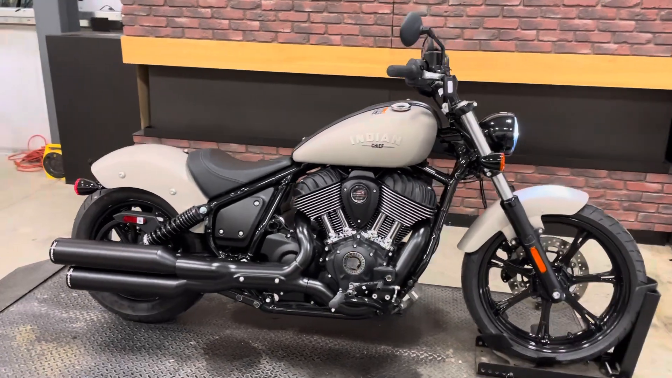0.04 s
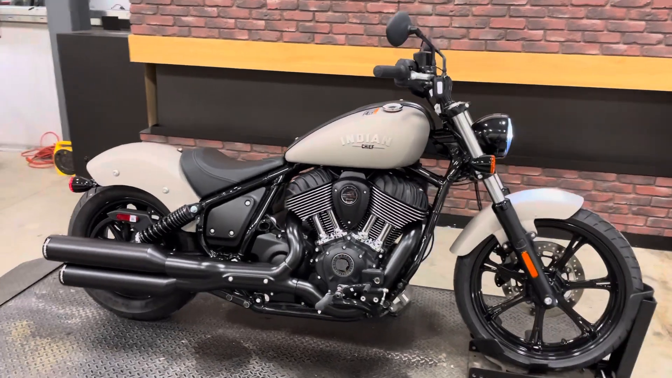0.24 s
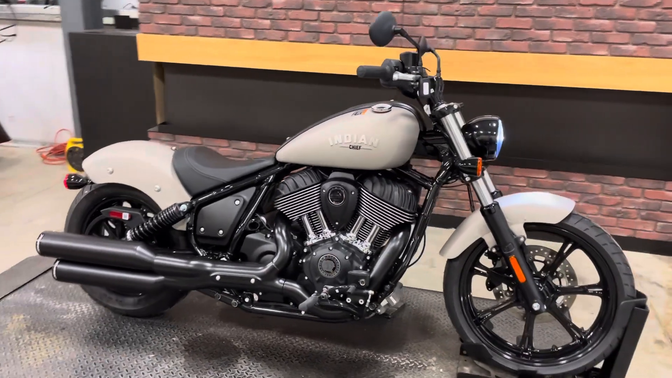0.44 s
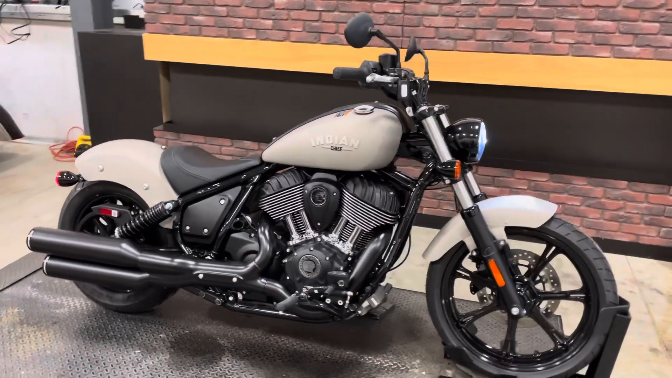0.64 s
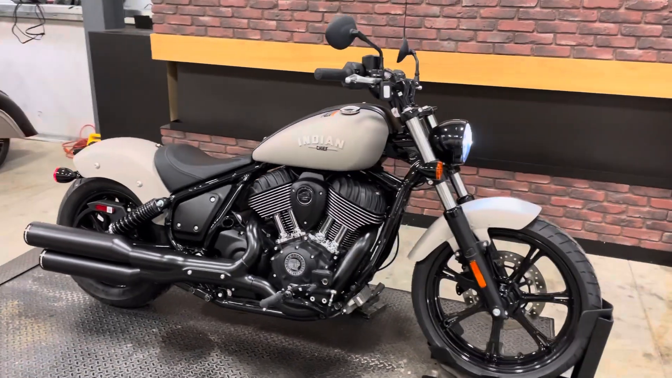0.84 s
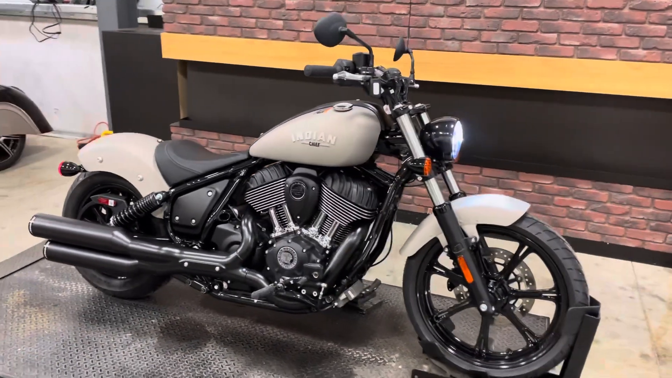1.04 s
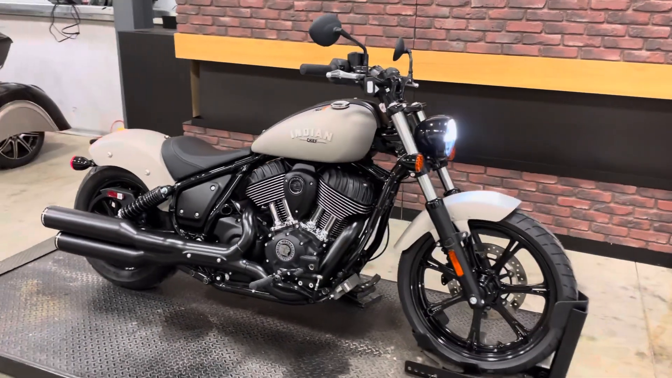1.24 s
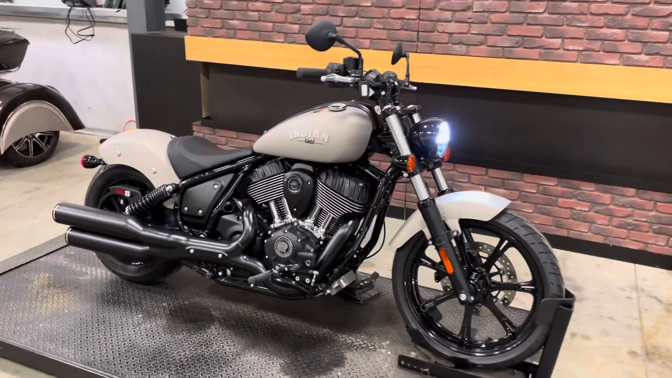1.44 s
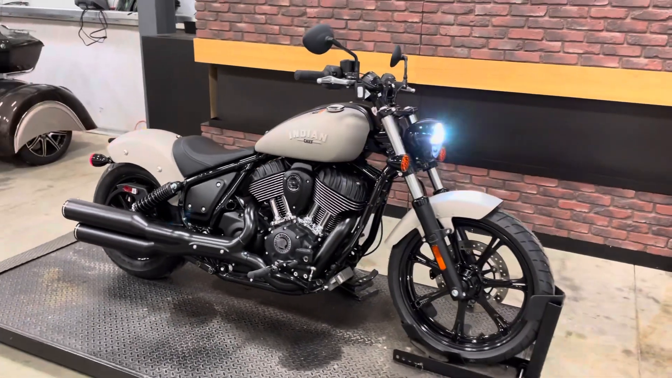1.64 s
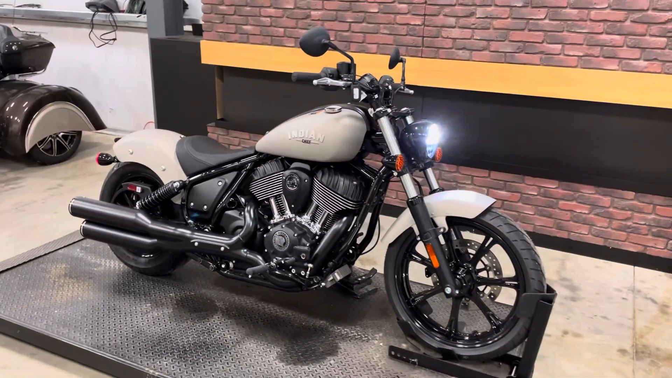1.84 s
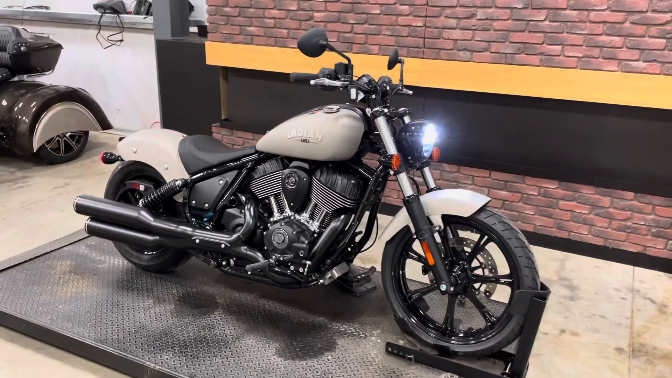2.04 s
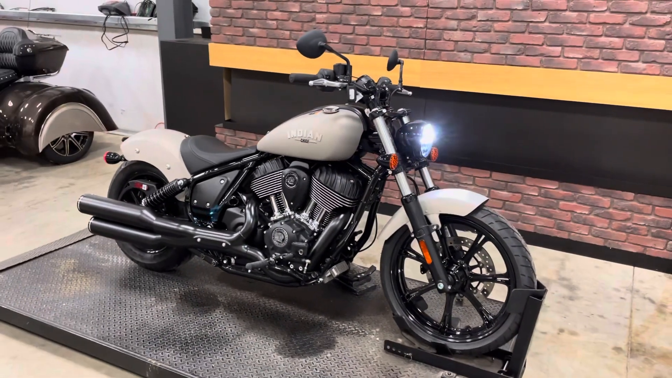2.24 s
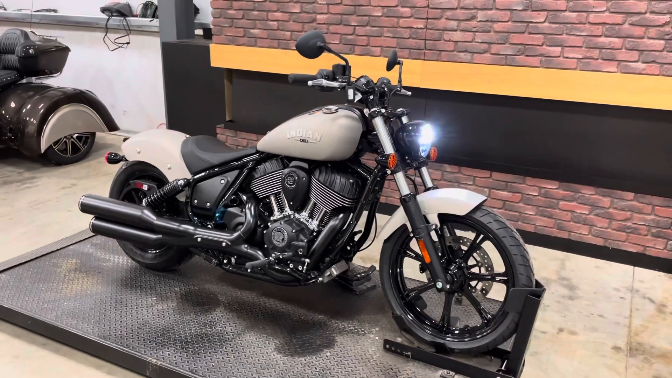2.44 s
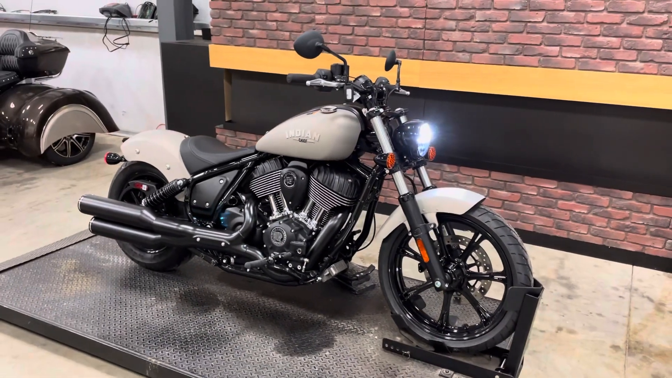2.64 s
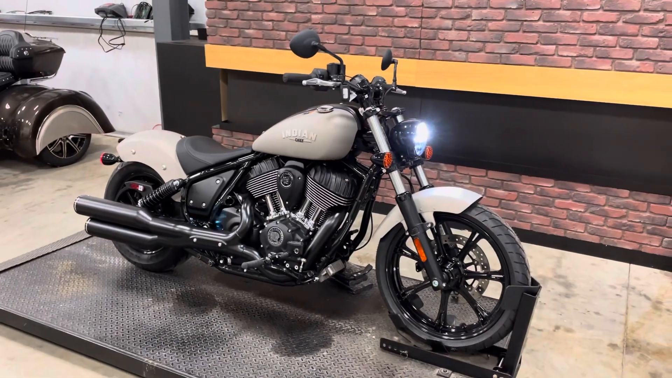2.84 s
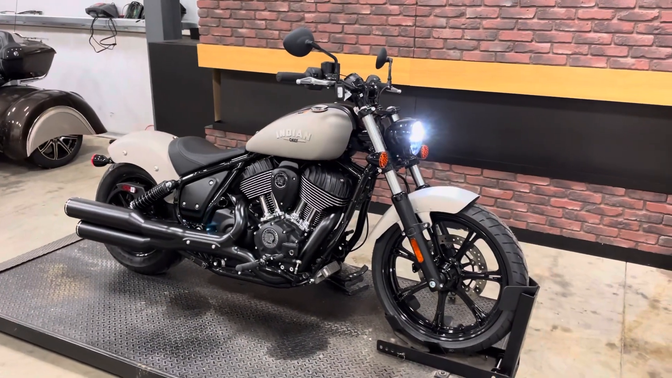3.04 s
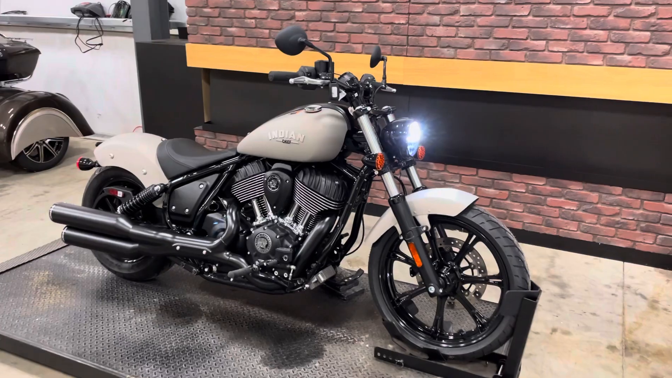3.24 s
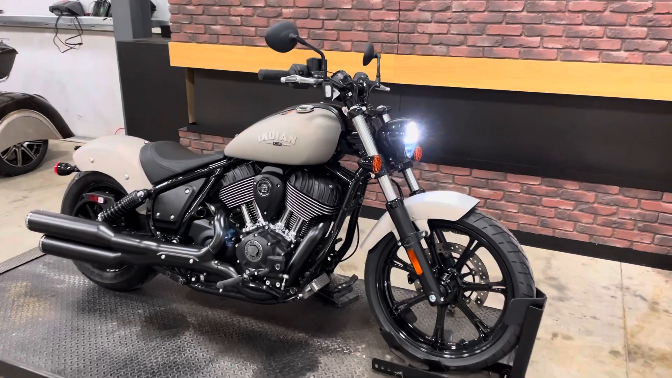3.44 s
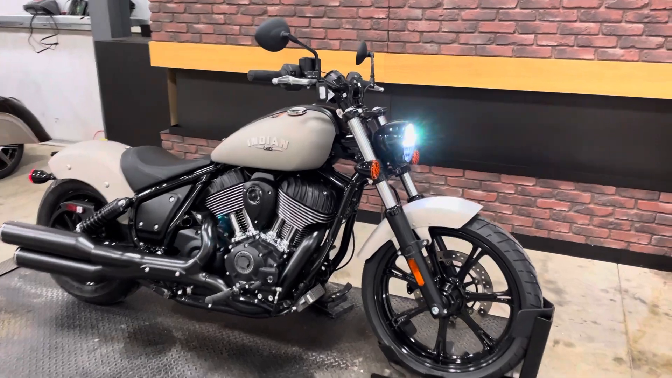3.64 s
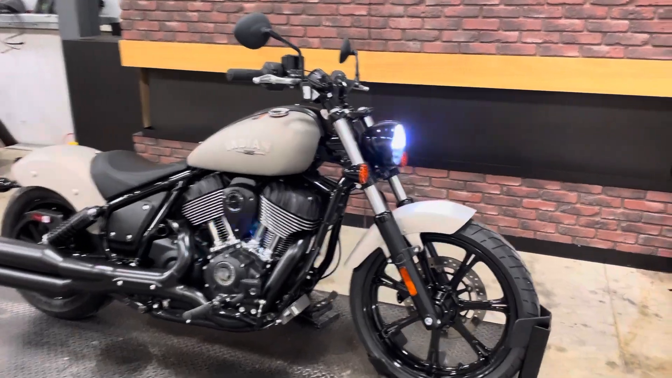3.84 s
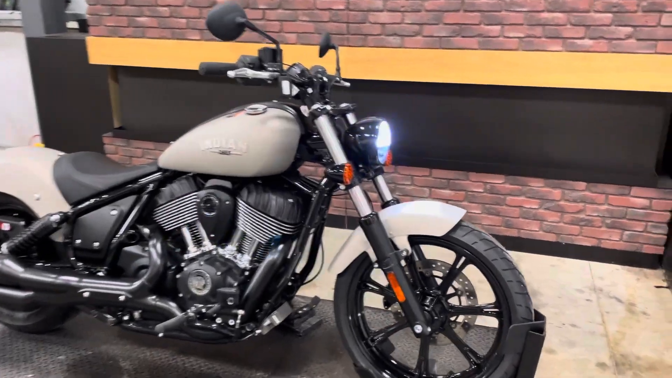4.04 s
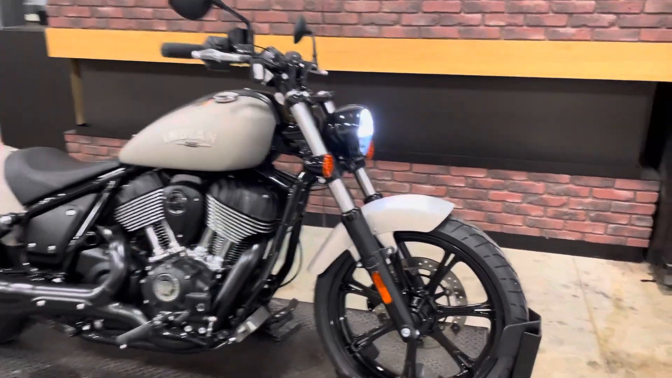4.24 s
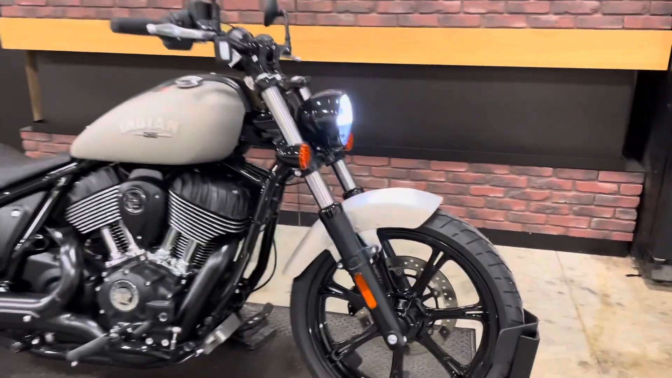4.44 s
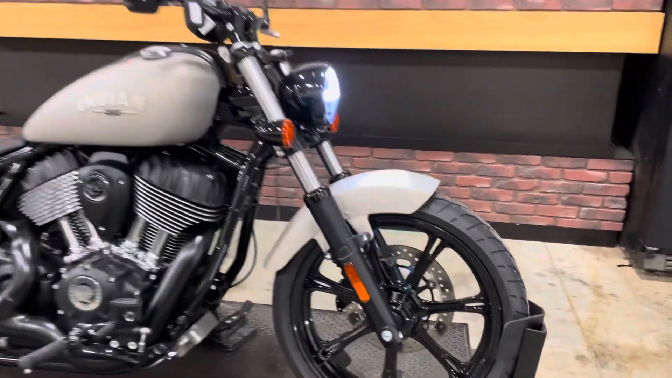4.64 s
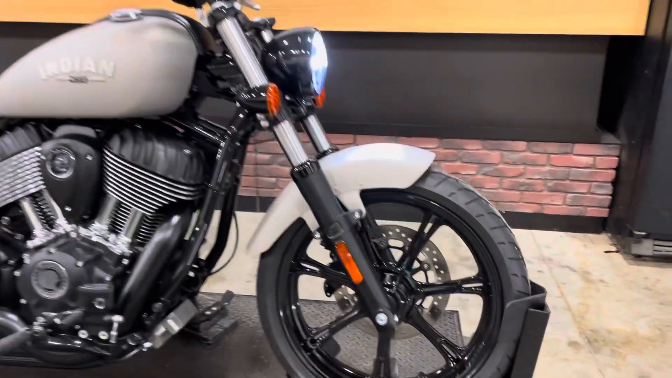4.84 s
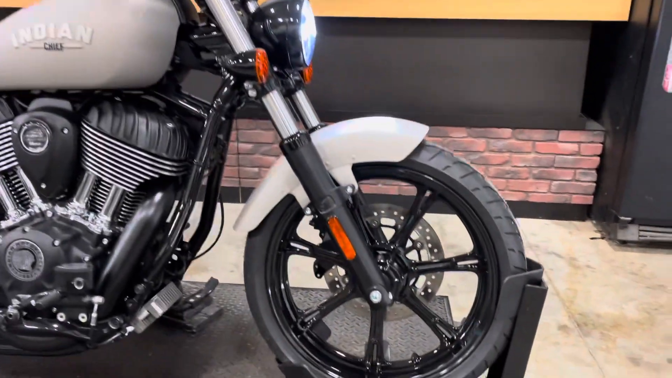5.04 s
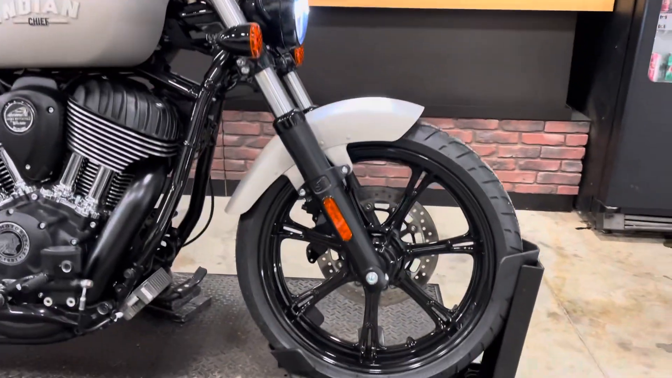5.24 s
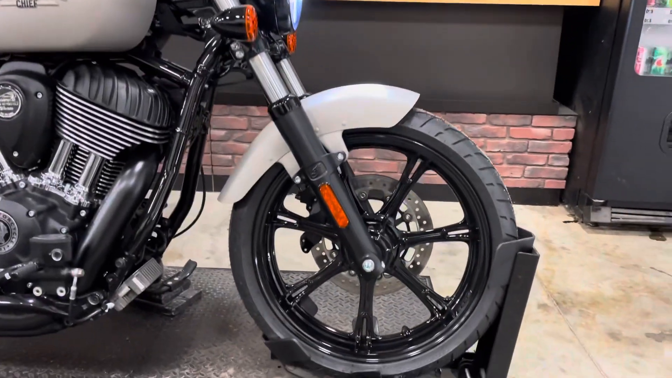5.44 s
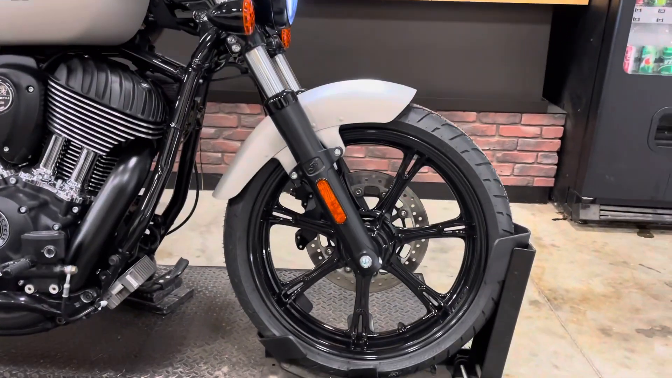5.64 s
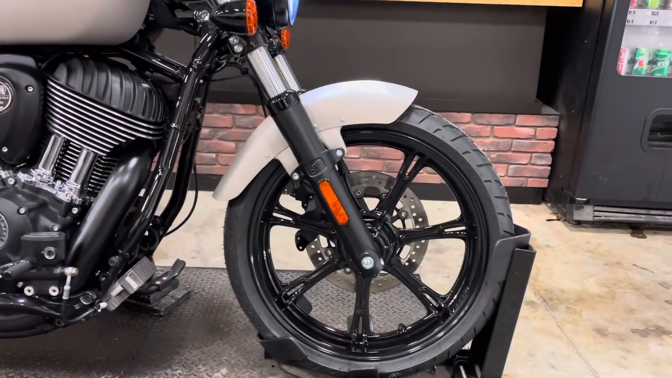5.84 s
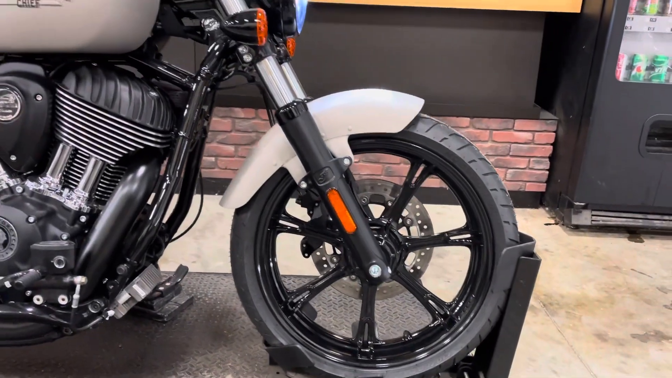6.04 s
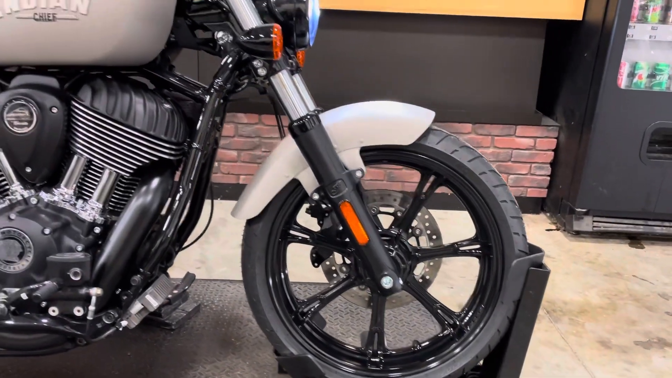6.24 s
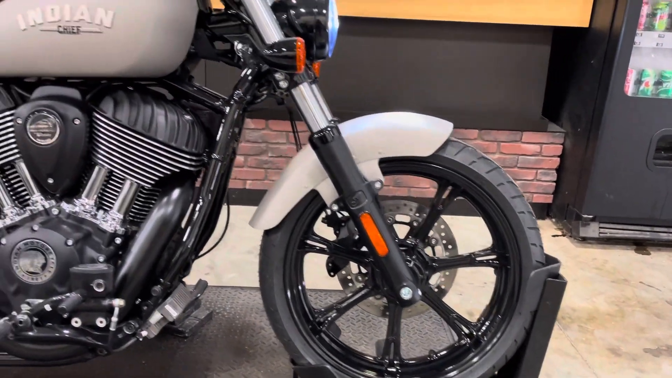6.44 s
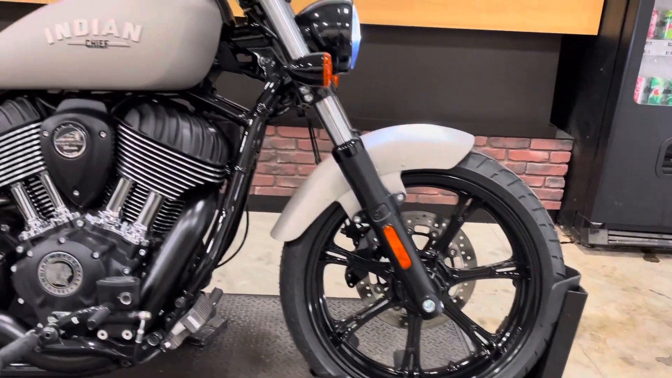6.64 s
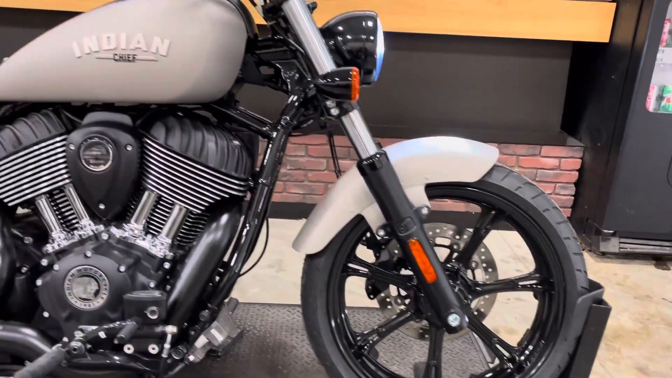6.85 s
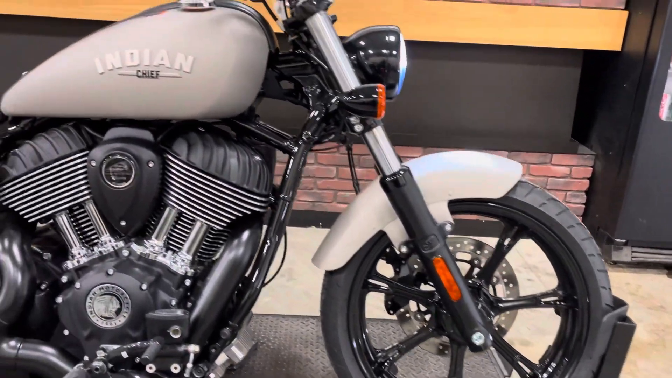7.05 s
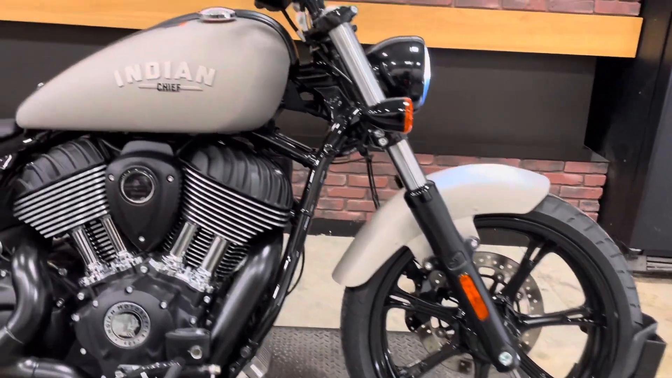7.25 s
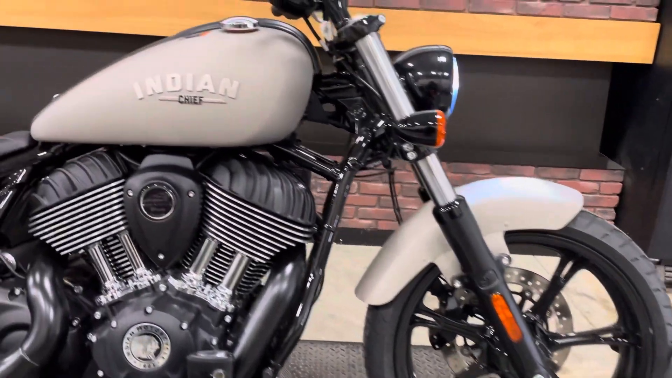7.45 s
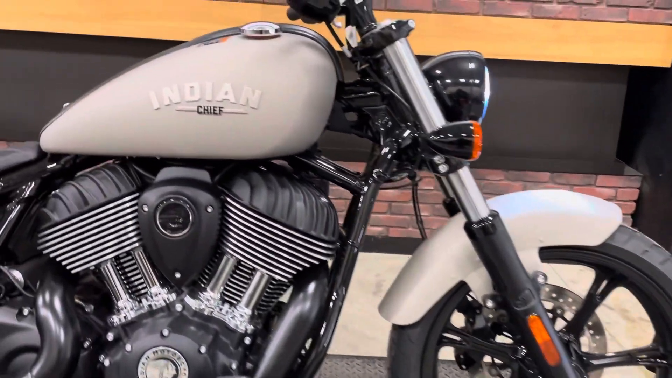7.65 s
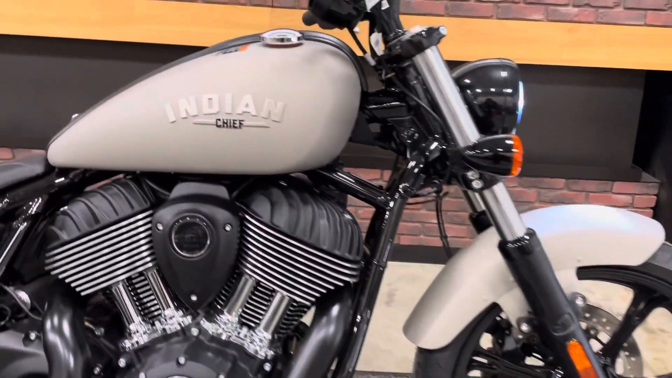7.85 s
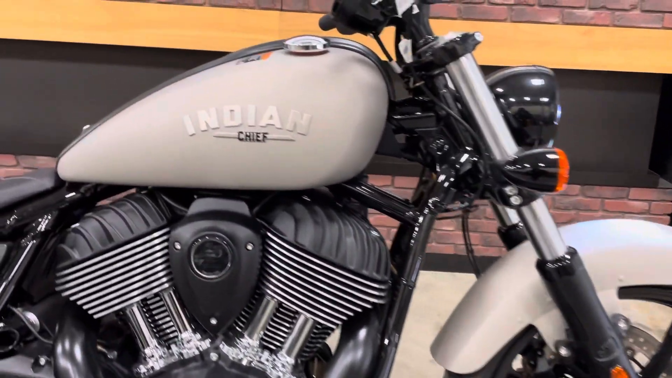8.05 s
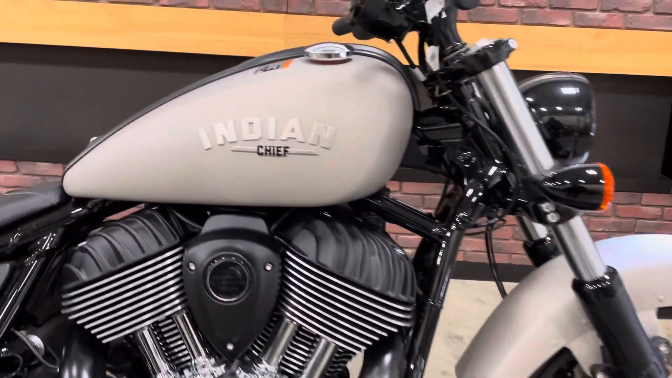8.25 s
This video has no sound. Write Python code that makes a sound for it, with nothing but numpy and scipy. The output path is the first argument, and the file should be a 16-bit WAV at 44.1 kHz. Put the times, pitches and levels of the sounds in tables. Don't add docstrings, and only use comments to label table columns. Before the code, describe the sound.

A big twin-cylinder motorcycle idles with an uneven, loping low thump and metallic engine clatter, growing louder and closer in a hard-walled showroom.

```python
import sys
import numpy as np
from scipy import signal
from scipy.fft import rfft, irfft, next_fast_len
from scipy.io import wavfile
from scipy.ndimage import uniform_filter1d, map_coordinates

SR = 44100
rng = np.random.default_rng(int(sys.argv[2]) if len(sys.argv) > 2 else 0)


def to_wav(s):
    ch = np.atleast_2d(s).T
    pcm = np.round(np.clip(ch, -1, 1) * 32767)
    wavfile.write(sys.argv[1], SR, pcm.astype(np.int16))


def nominal_scale(level):
    x = np.asarray(level, float) / 20
    return 10 ** x


N = 366030


def unit(x):
    return x / np.sqrt(np.mean(x ** 2) + 1e-20)


def along(points, hz):
    f, v = np.transpose(points)
    return np.interp(np.log(hz + 1), np.log(f + 1), v)


def curves(rows):
    s, *columns = np.transpose(rows)
    return [np.interp(np.arange(N) / SR, s, column) for column in columns]


def wobble(rate):
    knots = rng.standard_normal(int(N * rate / SR) + 4)
    return map_coordinates(knots, [np.arange(N) * rate / SR])


def marked(rows, times):
    out = np.zeros(len(times))
    for s, db in rows:
        out[np.argmin(abs(times - s))] = db
    return out


def filtered(x, response):
    m = next_fast_len(N + SR // 2)
    return irfft(rfft(x, m) * response(np.fft.rfftfreq(m, 1 / SR)), m)[..., :N]


def peaks(modes, hz):
    return sum(db / (1 + (2 * (hz - centre) / width) ** 2) for centre, width, db in modes)


# t/s, engine cycles turned
CRANK = [(0.0062, 0.0), (0.6821, 4.5), (0.8199, 5.5), (1.0464, 7.0), (1.1127, 7.5), (1.706, 11.5),
         (2.0699, 14.0), (2.9565, 20.0), (3.0403, 20.5), (3.4759, 23.5), (3.9285, 26.5), (4.5811, 31.0),
         (4.9619, 33.5), (5.3844, 36.5), (6.99, 47.5), (7.1432, 48.5), (7.5145, 51.0), (8.2431, 56.0)]
# t/s, thump level/dB
WEAK = [(0.096, -1.5), (0.307, -6), (0.457, -3.5), (0.609, -5.5), (0.754, -4.5), (0.894, -1), (1.046, -3),
        (1.335, -5.5), (1.634, -7), (1.864, -8.5), (2.071, -3), (2.368, -6), (2.747, 3.5), (2.81, -3.5),
        (2.959, -11), (3.115, -2.5), (3.404, -4.5), (3.704, -11.5), (4.145, -6), (4.735, 0.5), (4.821, -4),
        (5.314, -1.5), (6.917, -5), (7.067, -2), (7.662, -1.5), (8.099, -6), (8.245, -5)]
# t/s, level/dB
NEAR = [(0, 0.5), (.9, 1.5), (2, 2), (2.7, 4), (3.5, 6), (4.3, 8), (5.2, 11.5), (5.8, 10.5), (6.5, 12.5),
        (7, 13), (7.6, 15), (8.3, 13.5)]
FRONT_AFTER = .58
LATE_S_PER_DB, LATE_TOP_DB = .00026, 8


def firings():
    s, turned = np.transpose(CRANK)
    k = np.arange(int(2 * turned[-1]) + 1)
    due = np.interp(k // 2 + k % 2 * FRONT_AFTER, turned, s)
    loss_db = marked(WEAK, due)
    late = LATE_S_PER_DB * np.clip(-loss_db, 0, LATE_TOP_DB)
    times = due + late + np.roll(late, 1) * (k > 0)
    return times, k % 2, loss_db, np.interp(times, *np.transpose(NEAR))


def train(sizes, lead):
    spikes = np.zeros(N)
    at = ((firings()[0] - lead) * SR).astype(int)
    spikes[np.clip(at, 0, N - 1)] = sizes
    return spikes


def swell(sizes, lead, rise, fall):
    t = np.arange(SR // 6) / SR
    shape = (1 - np.exp(-(t / rise) ** 2)) * np.exp(-t / fall)
    return signal.oaconvolve(train(sizes, lead), shape)[:N]


# f/Hz, level/dB per Hz
CENTRE = [(150, -16), (250, -2), (360, -2), (536, -9), (772, -7), (1470, -17.5), (2420, -23.5),
          (3430, -26.5), (5870, -25.5), (7400, -33), (8400, -40), (9700, -32), (11500, -29), (13200, -36),
          (14400, -47), (15900, -53)]
# f/Hz, level/dB per Hz
SIDES = [(150, -30.5), (250, 3), (616, -1.5), (772, -1), (1390, -3), (2150, -20.5), (3800, -28),
         (6400, -27.5), (8300, -23.5), (10000, -28.5), (11600, -52), (13000, -35.5), (14500, -29.5),
         (15900, -34)]
# f/Hz, phase/rad
TURN = [(250, 2.1), (600, 0.79), (1200, 1.24), (3000, 0.6), (8000, 0.9)]
# f/Hz, width/Hz, level/dB
BODY = [(351, 57, 2), (484, 27, 4), (573, 4.2, 6), (670, 37, 3), (1690, 11, 6.5), (2300, 28, 3.5),
        (4580, 80, 3), (5050, 82, 2), (6040, 74, -7.5)]


def ports(share, lo_hz, hi_hz, side_db, alike, patchy_db):
    z = rng.standard_normal((2, 257, N // 256 + 2, 2)) @ [1, 1j]
    field = uniform_filter1d(rng.standard_normal(z.shape[1:]), 5, 0)
    field = uniform_filter1d(field, 6, 1)
    window = np.sin(np.pi * (np.arange(512) + .5) / 512)
    a, b = signal.istft(z * nominal_scale(patchy_db * unit(field)), window=window, nperseg=512)[1][:, :N]
    pair = np.array([a, alike * a + np.sqrt(1 - min(alike, 1) ** 2) * b])

    def response(hz):
        port_db = np.array([along(CENTRE, hz), along(SIDES, hz) + side_db])
        colour = nominal_scale(along(share, hz) + peaks(BODY, hz) + port_db)
        return colour * [1 + 0 * hz, np.exp(1j * along(TURN, hz))]

    pair = filtered(pair, response)
    size = 2 ** 18
    part = rfft(pair[0, :size])[int(lo_hz / SR * size):int(hi_hz / SR * size)]
    return pair * 2 ** 17.5 / np.linalg.norm(part)


def beat():
    return unit(1 + .5 * swell(1.0, lead=0.014, rise=0.0096, fall=0.012))


# f/Hz, level/dB
CLATTER = [(250, -6.5), (1000, -4.5), (1600, -3), (3000, -10.5), (6000, -41.5)]
CLATTER_DB, CLATTER_GROWS = -46, 0.9


def clatter(near_db):
    level_db = CLATTER_DB + CLATTER_GROWS * near_db + 0.37 * wobble(4.32)
    noise = ports(CLATTER, 478, 1500, side_db=-14.5, alike=0.91, patchy_db=1.5)
    return nominal_scale(level_db) * beat() * noise


# f/Hz, level/dB
WHIRR = [(800, -57.5), (2000, 6.5), (4000, 4.5), (7000, 3), (10000, -8)]
WHIRR_DB, WHIRR_GROWS = -54.5, 0.98


def whirr(near_db):
    level_db = WHIRR_DB + WHIRR_GROWS * near_db + 0.96 * wobble(4)
    noise = ports(WHIRR, 1750, 8400, side_db=-2.5, alike=0.5, patchy_db=3.0)
    return nominal_scale(level_db) * beat() * noise


# t/s, silencer level/dB, tank level/dB
FACING = [
    (0, -3, -1),
    (.7, -3, 0),
    (1.2, 2, -1),
    (2.4, -2, 1),
    (3.4, 1.5, -3),
    (4, 3.5, 2.5),
    (4.6, -2.5, 4.5),
    (5.5, 1, 2),
    (7.2, -3, 1),
    (8.3, 0.5, 1),
]
SILENCER_DB, SILENCER_GROWS = -46, 0.67
TANK_DB, TANK_GROWS, DRIFT_DB = -56, 1.0, 1


def drones(near_db):
    silencer_band = [(290, -26.0), (350, 0.0), (400, -2.0), (460, -40)]  # f/Hz, level/dB
    tank_band = [(660, -34), (750, -7.5), (790, -10.5), (880, -37.0)]  # f/Hz, level/dB
    silencer = ports(silencer_band, 335, 500, side_db=-11, alike=1.0, patchy_db=0.5)
    tank = ports(tank_band, 730, 810, side_db=-12.5, alike=0.9, patchy_db=2.0)
    throb = unit(1 + 0.79 * swell(0.99, lead=0, rise=0.0054, fall=0.02))
    silencer_db, tank_db = curves(FACING)
    silencer_db = silencer_db + SILENCER_DB + SILENCER_GROWS * near_db + DRIFT_DB * wobble(3.3)
    tank_db = tank_db + TANK_DB + TANK_GROWS * near_db + DRIFT_DB * wobble(3)
    return throb * (nominal_scale(silencer_db) * silencer + nominal_scale(tank_db) * tank)


# t/s, level/dB
HARD = [(0.007, 4), (0.609, -6), (0.754, 1), (1.126, 6.5), (1.482, -7), (1.719, 3.5), (2.071, 2),
        (2.218, 0), (2.302, 1.5), (2.515, -4), (2.81, 0), (3.258, 3), (3.49, 2), (3.704, -4.5), (3.941, 2),
        (4.003, -2), (4.085, -4), (4.145, -8.5), (4.518, 4), (4.581, -3.5), (4.67, 3), (4.821, 6),
        (4.886, -1.5), (5.175, -4), (6.479, 1), (6.773, -4.5), (7.365, -0.5), (7.888, 2)]
# f/Hz, level/dB
PUFF = [(300, -12), (900, -14.5), (2000, -3), (5000, -4), (9000, 0.5)]
# t/s, puff level/dB
PIPES = [
    (0, 2),
    (1.3, 2),
    (2.1, -2),
    (2.7, 0.5),
    (3.2, 1),
    (6, 3),
    (8.3, 1.5),
]
PUFF_DB, PUFF_GROWS, FRONT_PUFF_DB = -52.5, 1.26, 2.5
PUFF_SCATTER_DB = 1.2
PUFF_FOLLOWS = 0.63


def puffs():
    times, front, _, near_db = firings()
    size_db = PUFF_DB + PUFF_GROWS * near_db + FRONT_PUFF_DB * front
    size_db += PUFF_FOLLOWS * marked(HARD, times) + np.interp(times, *np.transpose(PIPES))
    size_db += PUFF_SCATTER_DB * rng.standard_normal(len(front))
    size = nominal_scale(size_db)
    burst = swell(size, lead=0.016, rise=0.0046, fall=0.0077)
    hiss = nominal_scale(-9.5) * swell(size, lead=0.0091, rise=0.0053, fall=0.02)
    noise = ports(PUFF, 7950, 13500, side_db=-1.5, alike=0.25, patchy_db=3.5)
    return nominal_scale(-1.0) * (burst + hiss) * noise


KNOCK_DB, KNOCK_GROWS = -40, 1.225
KNOCK_SCATTER_DB = 1.3


def blows():
    times, _, _, near_db = firings()
    loss_db = KNOCK_SCATTER_DB * rng.exponential(size=len(times))
    return marked(HARD, times) + KNOCK_DB + KNOCK_GROWS * near_db - loss_db


# f/Hz, far level/dB, near level/dB, t60/s
CASES = [(947, 5.5, -4.5, 0.037), (1314, 2.5, -7, 0.042), (1639, -6.5, -3.5, 0.045), (1815, -7, 1, .035),
         (1970, -8, 2, 0.025), (2288, -0.5, -3.5, 0.059), (2451, -9, -1, 0.052), (2597, -10, -6.5, 0.037),
         (3140, -6.5, -9, 0.046), (3625, -13.5, -11.5, 0.028), (3973, -12, -12.5, 0.033),
         (4560, -4.5, -18, 0.059), (5040, -10.5, -9.5, 0.041), (5780, -5, -7.5, 0.044)]
NEAREST_DB = 13.5


def knocks(blow_db, rise_s=.0025):
    out, t = np.zeros((2, N + SR)), np.arange(SR // 25) / SR
    hz, far_db, close_db, t60 = np.transpose(CASES)[:, :, None]
    ring = nominal_scale(-60 * t / t60) * (1 - np.exp(-(t / rise_s) ** 2))
    times, _, _, near_db = firings()
    taps = ((-.0135, -3), (.008, -7.5), (.03, -12.5))
    for s, db, share in zip(times, blow_db, np.clip(near_db / NEAREST_DB, 0, 1)):
        mode_db = far_db + share * (close_db - far_db)
        for lag, drop_db in taps:
            chance = rng.standard_normal((len(CASES), 3))
            size = nominal_scale(db + drop_db + mode_db + 4.57 * chance[:, :1])
            phase = 2 * np.pi * hz * (1 + 0.023 * chance[:, 1:2]) * t + 3 * chance[:, 2:3]
            tap = (size * ring * np.sin(phase.astype(np.float32))).sum(0)
            out[0, max(round((s + lag) * SR), 0):][:len(t)] += tap
    return out[:, :N]


# f/Hz, level/dB
CRACK = [(500, -16), (1200, -14.5), (2300, 9.5), (4500, -7), (8000, 1.5), (12000, -4.5)]


def ticks(blow_db):
    size = nominal_scale(blow_db)
    strike = swell(size, lead=0.01286, rise=0.0025, fall=0.0027)
    seating = nominal_scale(-10) * swell(size, lead=-0.0087, rise=0.0018, fall=0.0024)
    noise = ports(CRACK, 1000, 3000, side_db=-9.5, alike=1.0, patchy_db=0.5)
    return nominal_scale(0.5) * (strike + seating) * noise


# t/ms, f/Hz, signed size far, midway, near
REAR = [(-4.5, 82, -0.18, -0.19, -0.33), (-3.0, 200, 0.12, 0.09, 0.1), (3.5, 168, 0.18, 0.18, 0.2),
        (4.5, 100, 0.49, 0.61, 0.81), (16.5, 130, 0.13, 0.22, 0.52), (28.0, 168, 0.27, 0.33, 0.58),
        (32.0, 82, -0.08, -0.15, 0.2), (35.5, 150, -0.01, -0.29, -0.28), (45.5, 200, -0.1, -0.07, 0.07),
        (46.5, 82, 0.06, -0.22, -0.32), (55.0, 168, -0.06, -0.08, -0.16), (65.0, 100, 0.14, 0.26, 0.28),
        (67.5, 82, 0.02, -0.01, 0.28), (78.0, 150, 0.08, -0.09, -0.15)]
# t/ms, f/Hz, signed size far, midway, near
FRONT = [(-2.5, 200, 0.16, 0.31, 0.26), (2.0, 100, 0.2, 0.23, 0.17), (4.5, 115, 0.75, 0.91, 0.86),
         (13.5, 168, 0.11, 0.16, 0.03), (26.0, 130, 0.21, 0.01, 0.41), (35.0, 150, -0.02, -0.53, -0.39),
         (36.5, 130, 0.15, 0.09, -0.5), (39.0, 65, 0.04, 0.2, 0.1), (51.5, 150, 0.19, 0.19, 0.02),
         (56.5, 82, 0.18, 0.05, 0.27), (73.0, 130, 0.11, 0.32, 0.1), (81.5, 150, 0.04, 0.17, 0.29),
         (95.0, 130, -0.17, -0.12, -0.29), (114.0, 115, -0.04, -0.14, -0.2)]
# t/s, place (0 far - 2 near)
WALK = [
    (2, 0),
    (5, 1),
    (7.3, 2),
]
# nearness level/dB, thump level/dB
HELD = [(0, -6), (1, -3), (5.5, -1.6), (9, 2.14), (13, 1.4)]
THUMP_SCATTER_DB = -0.44


def thumps(cycles=.9, squeeze=.6):
    before = SR // 25
    out, t = np.zeros(N + SR), np.arange(-before, SR // 7) / SR
    times, front, loss_db, near_db = firings()
    scatter_db = THUMP_SCATTER_DB * rng.standard_normal(len(times))
    level_db = np.interp(near_db, *np.transpose(HELD)) + loss_db + scatter_db
    places = np.interp(times, *np.transpose(WALK))
    arrivals = [np.array(REAR), np.array(FRONT)]
    packets = []
    for rows in arrivals:
        turns = (t - rows[:, :1] / 1000) * rows[:, 1:2]
        packets.append(np.cos(2 * np.pi * turns) * np.exp(-(turns / cycles) ** 2))
    for s, which, db, place in zip(times, front, level_db, places):
        rows = arrivals[which]
        size = np.array([np.interp(place, np.arange(len(r)), r) for r in rows[:, 2:]])
        size = size * nominal_scale(rng.normal(0, 1.4, len(rows)) * (rows[:, 0] > 12))
        out[round(s * SR):][:len(t)] -= nominal_scale(squeeze * db + 0.06) * size @ packets[which]
    return out[before:][:N]


# f/Hz, level/dB per Hz
BOOM = [(13, -51.5), (30, -7), (66, -4), (90, -1.5), (195, -0.5), (235, -14), (300, -26.5), (400, -69.5)]
# f/Hz, level/dB
BOOM_SIDE = [(30, -28), (100, -19), (200, -18.5), (300, -30)]
# f/Hz, width/Hz, level/dB
HOLLOW = [(80.7, 3.6, -5), (161.6, 16, 2), (208.3, 28, 3.5)]
BOOM_DB, BOOM_GROWS = -25.5, .55


def boom(near_db, t60=0.72):
    t = np.arange(SR // 2) / SR
    tails = rng.standard_normal((3, 2, len(t))) * nominal_scale(-60 * t / t60) * (1 - np.exp(-t / 0.048))
    mix = rng.standard_normal((len(firings()[0]), 3))
    pair = np.zeros((2, N))
    for sizes, tail in zip(mix.T, tails):
        pair += signal.oaconvolve(train(sizes, 0)[None], tail, axes=1)[:, :N]

    def response(hz):
        side_db = along(BOOM_SIDE, hz) + 9
        return nominal_scale(along(BOOM, hz) + peaks(HOLLOW, hz) + np.array([0 * hz, side_db]))

    pair = filtered(pair, response)
    return nominal_scale(BOOM_DB + BOOM_GROWS * near_db) * pair / np.std(pair[0])


def scene():
    near_db, = curves(NEAR)
    blow_db = blows()
    pair = clatter(near_db) + whirr(near_db) + drones(near_db)
    pair += puffs() + knocks(blow_db) + ticks(blow_db)
    pair += boom(near_db)
    pair[0] += thumps()
    centre, side = pair
    return np.array([centre + side, centre - side])


def roll_off(x):
    return signal.sosfilt(signal.butter(12, 15920, fs=SR, output="sos"), x)


def record(dry):
    ceiling = .93
    soft = dry / (1 + np.abs(dry / ceiling) ** 6) ** (1 / 6)
    return roll_off(soft)


dry = scene()
out = record(dry)
to_wav(out)
```